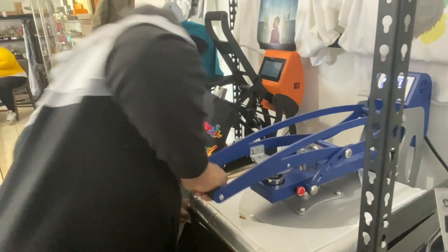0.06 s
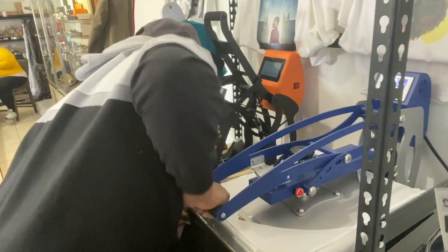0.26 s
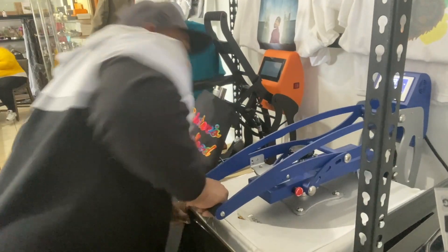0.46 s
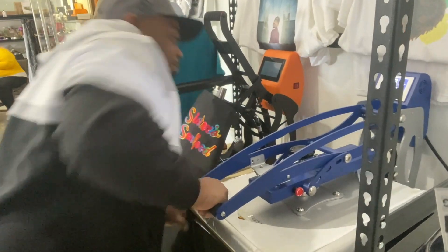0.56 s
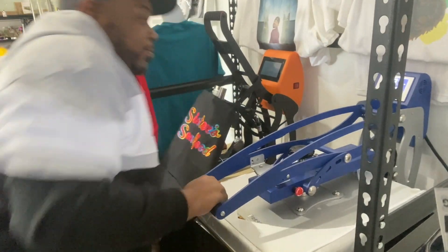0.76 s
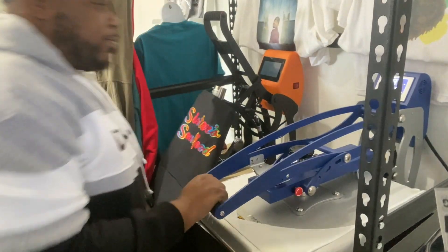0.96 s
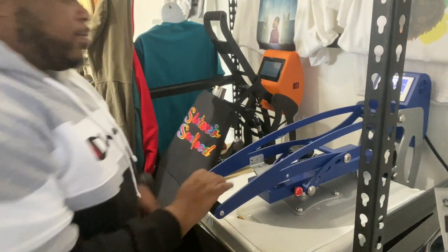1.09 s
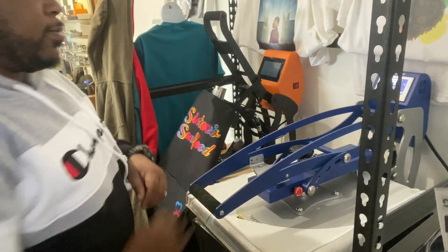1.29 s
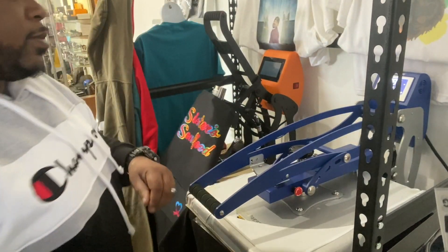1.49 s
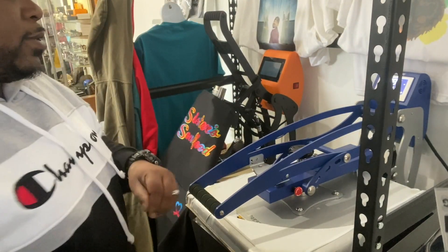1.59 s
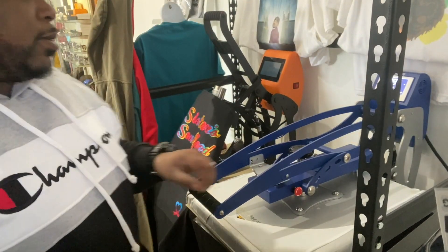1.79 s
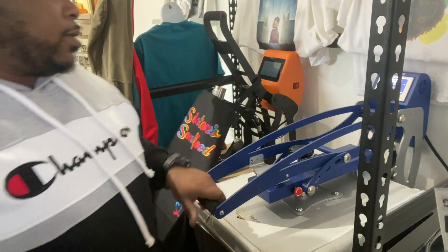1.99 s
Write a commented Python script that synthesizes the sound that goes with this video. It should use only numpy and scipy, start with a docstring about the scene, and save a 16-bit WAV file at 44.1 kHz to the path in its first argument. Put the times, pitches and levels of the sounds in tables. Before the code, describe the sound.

Close by in a small quiet room, a metal press lever snaps shut almost at once, its frame ringing briefly, followed by a loose rattle, soft bumps, sleeve brushing, finger taps, tiny clicks and low hum.

```python
"""A clamshell heat press in a small workshop, heard from close by over quiet air and a low rumble.
The platen swings down with a hollow rumble while paper rustles, sleeves brush and the linkage creaks;
the lever snaps over and locks with a steel clack (noise cracks and damped modes) that rings the frame.
A loose part settles and soft knocks follow. Fingers slide off and tap the handle, the heater hum grows,
then come small clicks, flicks of the sheet and faint squeaks. Friction is grainy coloured noise."""
import sys
import numpy as np
from scipy import signal
from scipy.fft import rfft, irfft, next_fast_len
from scipy.io import wavfile
from scipy.ndimage import map_coordinates

SR = 44100
rng = np.random.default_rng(int(sys.argv[2]) if len(sys.argv) > 2 else 0)


def int16_out(signal):
    """Quantize to a 16-bit WAV file."""
    q = np.round(np.clip(np.atleast_2d(signal).T, -1, 1) * 32767)
    wavfile.write(sys.argv[1], SR, q.astype(np.int16))


N = 90404


def amp(db):
    """Decibels to a linear factor."""
    return 10 ** (np.asarray(db) / 20)


def unit(x):
    """x scaled to rms 1."""
    return x / np.sqrt(np.mean(x ** 2) + 1e-20)


def along(points, hz):
    """(Hz, value) points read on a log frequency axis."""
    f, v = np.transpose(points)
    return np.interp(np.log(hz + 1), np.log(f + 1), v)


def since(s):
    """Seconds since s, zero before it."""
    return np.maximum(np.arange(N) / SR - s, 0)


def fade(t, t60):
    """Exponential decay by 60 dB in t60 seconds."""
    return np.exp(-np.log(1000) * t / t60)


def filtered(x, response):
    """x times a response of frequency."""
    m = next_fast_len(N + SR // 2)
    hz = np.fft.rfftfreq(m, 1 / SR)
    return irfft(rfft(x, m) * response(hz), m)[:N]


def noise(spectrum):
    """Coloured noise of rms 1."""
    white = rng.standard_normal(N)
    return unit(filtered(white, lambda hz: amp(along(spectrum, hz))))


def wobble(rate):
    """A smooth random curve, rate knots a second."""
    knots = rng.standard_normal(N // 8)
    return map_coordinates(knots, [np.arange(N) * rate / SR], mode="wrap")


def dying(x, t60s):
    """Each frequency of x dies at its own speed."""
    hz, t, z = signal.stft(x, SR, nperseg=256)
    decay = fade(t, along(t60s, hz)[:, None])
    return signal.istft(z * decay, SR, nperseg=256)[1][:N]


def ring(modes, s, rise_s):
    """Half a second of damped modes struck at s, neighbours in opposite directions."""
    t = np.arange(SR // 2) / SR
    vibration = np.zeros(len(t))
    for k, (hz, db, t60) in enumerate(modes):
        vibration += (-1) ** k * amp(db) * fade(t, t60) * np.sin(2 * np.pi * hz * t)
    onset = 1 - np.exp(-t / rise_s)
    return np.pad(vibration * onset, (round(s * SR), N))[:N]


def bursts(rows, spectrum, rise_s):
    """Short contacts of one colour, each dying at its own speed; their powers add."""
    power = np.zeros(N)
    for s, db, t60 in rows:
        onset = 1 - np.exp(-since(s) / rise_s)
        power += (amp(db) * fade(since(s), t60) * onset) ** 2
    return np.sqrt(power) * noise(spectrum)


def strokes(rows, spectrum):
    """Grainy friction that swells and dies away with each stroke."""
    level = np.zeros(N)
    for s, db, rise, t60 in rows:
        level += amp(db) * np.minimum(since(s) / rise, 1) * fade(since(s + rise), t60)
    grain_db, grains_per_s = 1, 700
    grain = amp(grain_db * wobble(grains_per_s))
    return level * unit(noise(spectrum) * grain)


def swinging_platen():
    """Moving steel: low noise, coloured by the hollow platen, swells and fades."""
    # swells of the swing: start_s, level_db, rise_s, t60_s
    swing_rows = [(0, -35, .002, 0.23), (.024, -39.5, .008, 0.29), (.07, -44, 0.026, .28),
                  (.13, -49.5, .008, .4)]
    # hollow colour: frequency_hz, relative_db
    hollow_colour = [(25, -28), (60, -5), (95, -2), (170, -7), (275, 1), (380, -11), (540, -4), (760, -18),
                     (960, -11), (1200, -23), (3000, -25), (12000, -79)]
    return strokes(swing_rows, hollow_colour)


def paper_rustles():
    """Sheets rub and crumple: bright grainy friction."""
    # rustles: start_s, level_db, rise_s, t60_s
    rustle_rows = [(0, -65, 0.0032, 1), (.13, -48.5, 0.0013, 0.11), (.165, -50.5, 0.08, 0.32),
                   (.44, -58, 0.0064, .25), (.67, -64, 0.0208, .2), (.752, -56.5, .009, 0.28)]
    # colour of paper: frequency_hz, relative_db
    paper_colour = [(300, -8), (1500, -9.5), (3000, -1.5), (6000, -0.5), (9000, -12), (15000, -22)]
    return strokes(rustle_rows, paper_colour)


def sleeves():
    """Sleeves and hands brush with a broad noise, and fabric slides with a thin hiss."""
    # brushing: start_s, level_db, rise_s, t60_s
    brush_rows = [(0, -47, .004, 0.5), (.15, -54.5, 0.021, 0.6), (.8, -63.5, 0.069, 0.9),
                  (.905, -57.5, .02, .2), (.953, -58, 0.0042, .1), (.97, -52.5, 0.0029, 0.11),
                  (1.005, -49.5, .026, 0.1), (1.06, -60.5, .02, 0.65), (1.29, -60, 0.025, .4),
                  (1.72, -58, 0.031, 0.29), (1.76, -57.5, 0.024, 0.28), (1.89, -68, 0.03, .6)]
    # colour of cloth: frequency_hz, relative_db
    cloth_colour = [(150, -3), (600, 0), (1400, 0), (2400, -2.5), (4000, -3), (7500, -8), (10000, -14.5),
                    (16000, -21.5)]
    # sliding fabric: start_s, level_db, rise_s, t60_s
    hiss_rows = [(.81, -67.5, .04, .8), (1.06, -74, .04, .4), (1.725, -67, 0.022, .3), (1.91, -74, .03, .4)]
    # colour of the thin hiss: frequency_hz, relative_db
    hiss_colour = [(3000, -25), (7000, -5), (11000, 0), (15500, -4)]
    return strokes(brush_rows, cloth_colour) + strokes(hiss_rows, hiss_colour)


def hum():
    """A faint, slightly unsteady electric hum that grows when the heater switches on."""
    pitch_hz, idle_db, added_db = 237.5, -63, -60
    on_s, rise_s = 1.127, 0.039
    level = amp(idle_db) + amp(added_db) * np.minimum(since(on_s) / rise_s, 1)
    return level * amp(.5 * wobble(8)) * np.sin(2 * np.pi * pitch_hz * since(0))


def quiet_workshop():
    """Steady background: soft air noise and a low rumble."""
    # colour of the air: frequency_hz, relative_db
    air_colour = [(100, -24), (250, -7), (450, 0), (700, -2), (1000, -6), (2000, -10), (4000, -16),
                  (7500, -17.5), (9000, -23.5), (16000, -25.5)]
    # colour of the rumble: frequency_hz, relative_db
    rumble_colour = [(20, -30), (40, -17), (60, -2.5), (95, 4.5), (125, -4), (170, -9.5), (260, -4.5),
                     (450, -22), (800, -29), (2000, -62)]
    air_db, rumble_db = -64.5, -60
    return amp(air_db) * noise(air_colour) + amp(rumble_db) * noise(rumble_colour)


def creaks():
    """The loaded linkage ticks: each tick rings the short modes of a pivot."""
    # ticks under load: start_s, level_db
    creak_rows = [(0.171, -44.5), (0.19, -43.5), (0.198, -42), (0.204, -39), (.2125, -32), (.2176, -29.5),
                  (.2192, -29), (.2207, -41), (0.2248, -32.5)]
    # modes of the pivot: frequency_hz, relative_db, t60_s
    pivot_modes = [(2100, -8, 0.0055), (4697, 1, .0045), (5557, -1, 0.0022), (6900, -0.5, .0045),
                   (13000, -19, .003)]
    return sum(amp(db) * ring(pivot_modes, s, rise_s=0.00031) for s, db in creak_rows)


def lock():
    """The linkage chatters shut, the platen seats, and frame and stand ring on."""
    # contacts of the lock: start_s, level_db, t60_s
    contact_rows = [(.2297, -29.5, .012), (.2316, -10.5, 0.025), (.2329, -14, 0.026), (.2356, -10.5, .025),
                    (.2394, -13, .03), (.2515, -39, .05), (.318, -52, 0.034)]
    # colour of their cracks: frequency_hz, relative_db
    crack_colour = [(100, -16), (450, -10.5), (700, -10.5), (1100, -11), (1550, -4.5), (2400, -6),
                    (3400, -11), (4200, -1.5), (5000, -8.5), (6700, -4), (8500, -12.5), (10000, -13.5),
                    (12000, -23), (16000, -20)]
    # modes of the steel linkage: frequency_hz, level_db, t60_s
    linkage_modes = [(1320, -20, .12), (1552.5, -11.5, .058), (1661, -19, .12), (1816, -22, 0.07),
                     (2058, -13.5, .04), (2350, -26, 0.065), (2884, -17, 0.058), (3277, -21.5, 0.086),
                     (3880, -24, .04), (4197, -14.5, .044), (4700, -24, .04), (5400, -18, .038),
                     (6480, -14, .052), (6500, -23, .135), (6410, -21, 0.059), (7260, -23, 0.055),
                     (9920, -25.5, 0.037)]
    # modes of the padded platen: frequency_hz, level_db, t60_s
    thud_modes = [(188.8, -22.5, 0.016), (270, -13, .035), (370.4, -16.5, 0.042), (489.4, -15, 0.063),
                  (708, -9, .032), (967, -19, 0.025)]
    # modes of the frame and platen: frequency_hz, level_db, t60_s
    frame_modes = [(96, -43, 0.55), (126, -35.5, .32), (174.1, -30, .2), (249.6, -21.5, 0.33),
                   (290, -34.5, 0.53), (319, -32, .45), (404, -31.5, .2), (530, -32, 0.17),
                   (612, -41, 0.67), (807, -31.5, 0.39), (903, -30.5, 0.29), (973, -38, 0.32),
                   (996, -37, 0.25), (1271, -20.5, 0.14), (1291.5, -24.5, 0.095), (1474, -24.5, 0.2),
                   (1630, -31, 0.27)]
    # dense ringing of the stand and its loose parts: frequency_hz, relative_db
    rattle_colour = [(30, -29), (70, -10), (130, 1), (450, -1.5), (600, -7), (900, 4), (1100, -10),
                     (1500, -1.5), (2200, -11), (4200, -10.5), (6600, -12.5), (10000, -32.5), (16000, -35)]
    # its decay: frequency_hz, t60_s
    rattle_decay = [(100, 0.64), (400, .54), (1000, 0.53), (4000, 0.53), (12000, .37)]
    lock_s, seat_s = .2318, .2375  # the linkage snaps over, then the platen seats
    linkage_rise_s, frame_rise_s = 0.0011, 0.002
    rattle_db = -28
    cracks = bursts(contact_rows, crack_colour, rise_s=0.00028)
    snap = cracks + ring(linkage_modes, lock_s, linkage_rise_s)
    seat = ring(thud_modes, seat_s, frame_rise_s) + ring(frame_modes, seat_s, frame_rise_s)
    rattle = dying(noise(rattle_colour), rattle_decay)
    stand = np.pad(rattle, (round(seat_s * SR), 0))[:N]
    return snap + seat + amp(rattle_db) * stand


def loose_part():
    """A loose part settles after the lock: one short burst of coloured noise."""
    # settling: start_s, level_db, t60_s
    settle_rows = [(.3688, -38.5, 0.11)]
    # colour of the loose part: frequency_hz, relative_db
    loose_colour = [(200, -12), (500, 8), (1000, -19), (3200, 5.5), (7000, 0), (9000, -7.5), (16000, -16)]
    return bursts(settle_rows, loose_colour, rise_s=.001)


def knocks():
    """Soft bumps on the platen: low noise bursts with a slow onset."""
    # bumps: start_s, level_db, t60_s
    knock_rows = [(.625, -56, .15), (.648, -49, 0.23), (.683, -45, .08), (.725, -54.5, 0.2),
                  (.808, -51, 0.12)]
    # colour of a bump: frequency_hz, relative_db
    knock_colour = [(40, -42), (140, -22), (205, -9), (280, 2), (380, -18), (540, -8), (750, -25),
                    (1080, -18), (1500, -38), (8000, -46)]
    return bursts(knock_rows, knock_colour, rise_s=0.0032)


def sliding_fingers():
    """Fingers slide off the grip: grainy mid-range friction."""
    # slides: start_s, level_db, rise_s, t60_s
    slide_rows = [(1.003, -50.5, 0.0071, 0.085), (1.025, -50.5, 0.013, 0.083)]
    # colour of the grip: frequency_hz, relative_db
    grip_colour = [(700, -18), (1300, -1.5), (1800, -8), (2300, 4.5), (2700, -4), (3400, -18), (9000, -29)]
    return strokes(slide_rows, grip_colour)


def taps():
    """The hand taps the handle: short noise bursts with a sharp onset."""
    # taps: start_s, level_db, t60_s
    tap_rows = [(1.0033, -41.5, 0.043), (1.0155, -44, 0.079), (1.508, -51.5, 0.067)]
    # colour of a tap: frequency_hz, relative_db
    tap_colour = [(80, -25), (250, -19), (400, 7), (700, -2), (1050, 1.5), (1400, -9), (2500, -25),
                  (8000, -26), (16000, -42)]
    return bursts(tap_rows, tap_colour, rise_s=0.00026)


def clicks():
    """Small clicks: very short, bright noise bursts."""
    # clicks: start_s, level_db, t60_s
    click_rows = [(1.1385, -48, 0.018), (1.3852, -44.5, 0.011)]
    # colour of a click: frequency_hz, relative_db
    click_colour = [(500, -25), (2500, 6), (7000, 3), (11000, -6), (15000, -4)]
    return bursts(click_rows, click_colour, rise_s=0.00045)


def sheet_flicks():
    """Fingers flick the edge of the sheet: quick, bright friction."""
    # flicks: start_s, level_db, rise_s, t60_s
    flick_rows = [(1.252, -47.5, 0.0031, 0.16), (2.021, -50, 0.0039, 0.086)]
    # colour of a flick: frequency_hz, relative_db
    flick_colour = [(600, -18), (1800, -7), (3000, -2.5), (4500, -4), (7000, 2), (10000, -3.5),
                    (15500, -11)]
    return strokes(flick_rows, flick_colour)


def squeaks():
    """Thin, unsteady whistles that glide a little as they swell and fade."""
    # faint high squeaks: start_s, length_s, start_hz, end_hz, level_db
    squeak_rows = [(1.535, .04, 11100, 11640, -76), (1.58, .12, 9700, 9220, -77.5)]
    out = np.zeros(N)
    for s, length, start_hz, end_hz, db in squeak_rows:
        u = np.minimum(since(s) / length, 1)  # progress, 0 to 1
        glide = start_hz + (end_hz - start_hz) * u
        hz = glide * (1 + .008 * wobble(400))
        out += amp(db) * np.sin(np.pi * u) * np.sin(2 * np.pi * np.cumsum(hz) / SR)
    return out


def workshop(x):
    """The room's short reverberation: x convolved with noise that builds up, then dies."""
    # decay of the room: frequency_hz, t60_s
    room_decay = [(150, 0.34), (1500, .38), (6000, 0.21), (14000, 0.25)]
    build_up = np.minimum(since(0.0019) / 0.0098, 1)
    tail = dying(rng.standard_normal(N), room_decay) * build_up
    return signal.fftconvolve(x, tail / np.linalg.norm(tail))[:N]


def scene():
    """The press close by, its room, and the quiet of the workshop."""
    room_db = -15.5
    near = swinging_platen() + paper_rustles() + sleeves()
    near += creaks() + lock() + loose_part() + knocks()
    near += sliding_fingers() + taps() + clicks() + sheet_flicks() + squeaks()
    return (near + amp(room_db) * workshop(near) + hum() + quiet_workshop())[None]


def record(dry):
    """Peaks are rounded off below a ceiling, then a steep low-pass limits the band."""
    ceiling, top_hz = .85, 16000
    rounded = dry[0] / (1 + (dry[0] / ceiling) ** 6) ** (1 / 6)
    return filtered(rounded, lambda hz: 1 / np.sqrt(1 + (hz / top_hz) ** 160))[None]


dry = scene()
out = record(dry)
int16_out(out)
```